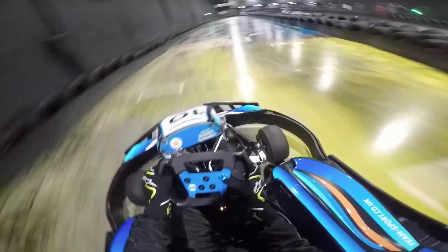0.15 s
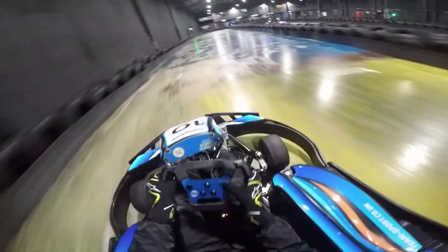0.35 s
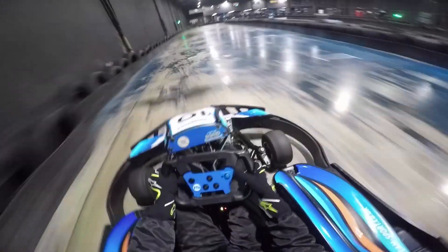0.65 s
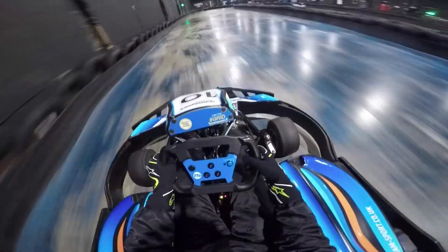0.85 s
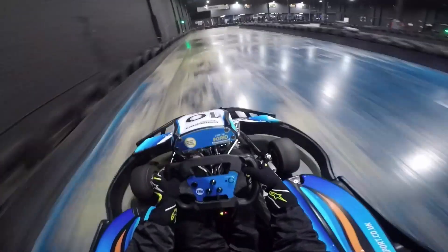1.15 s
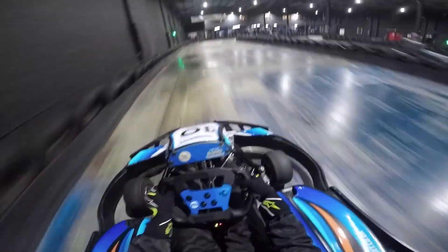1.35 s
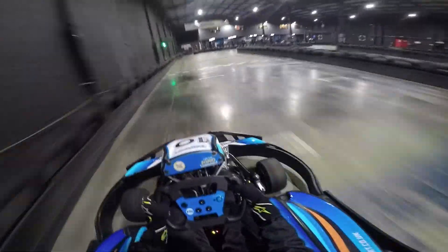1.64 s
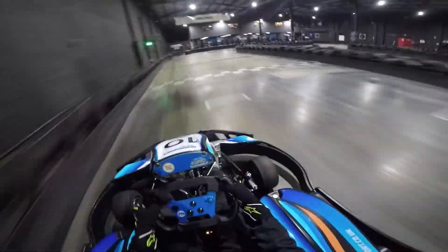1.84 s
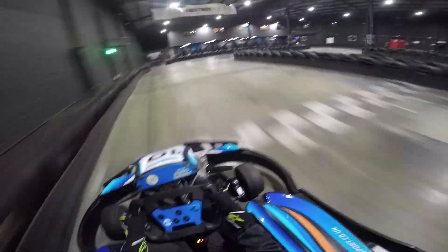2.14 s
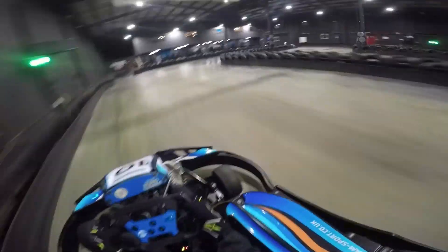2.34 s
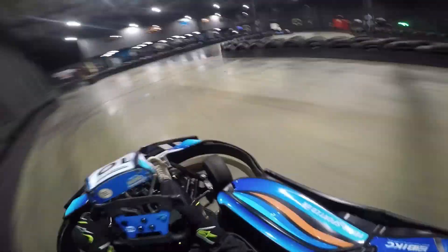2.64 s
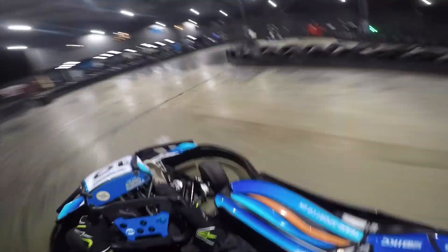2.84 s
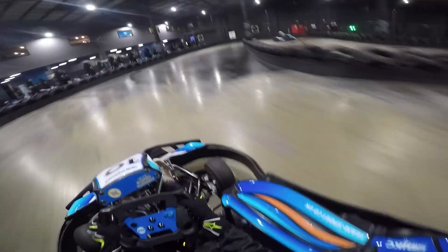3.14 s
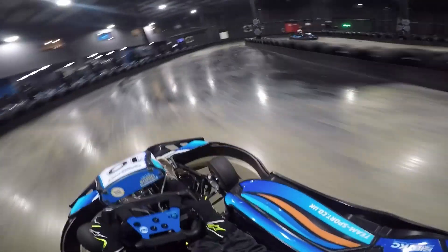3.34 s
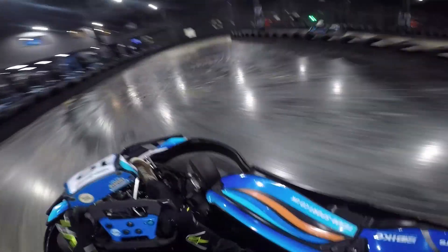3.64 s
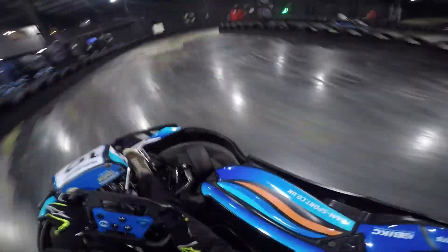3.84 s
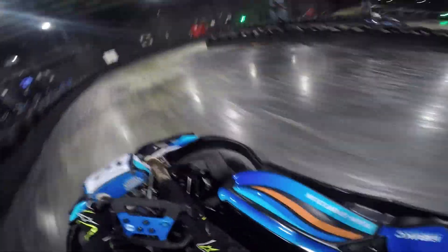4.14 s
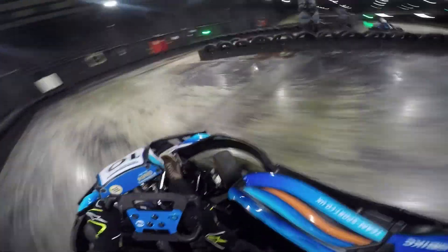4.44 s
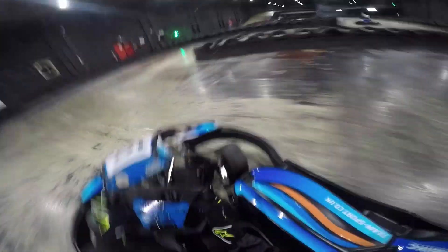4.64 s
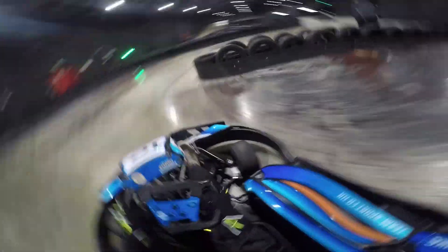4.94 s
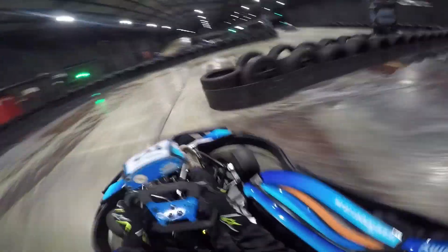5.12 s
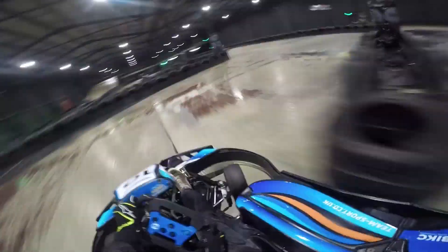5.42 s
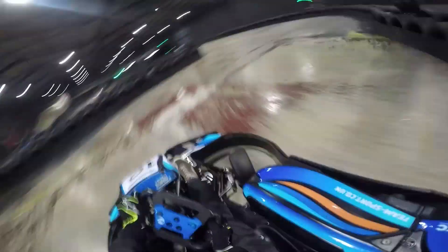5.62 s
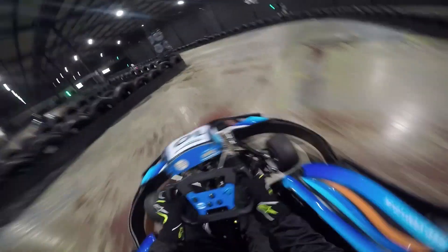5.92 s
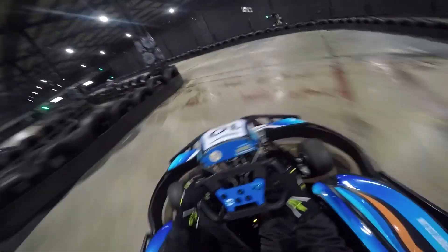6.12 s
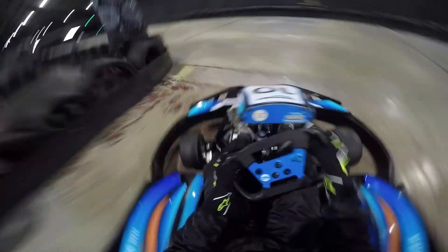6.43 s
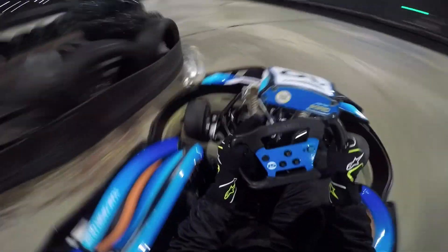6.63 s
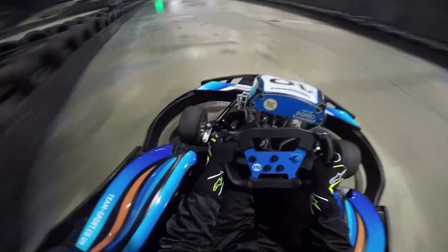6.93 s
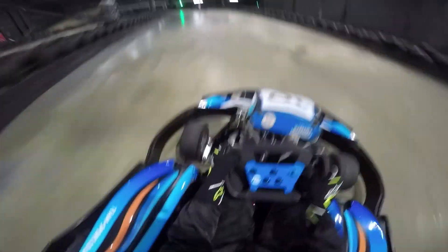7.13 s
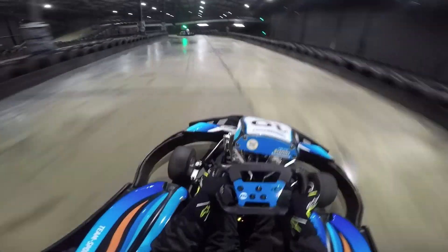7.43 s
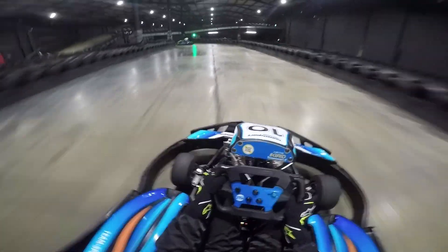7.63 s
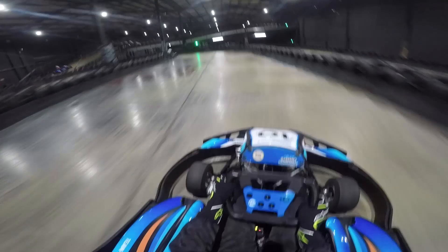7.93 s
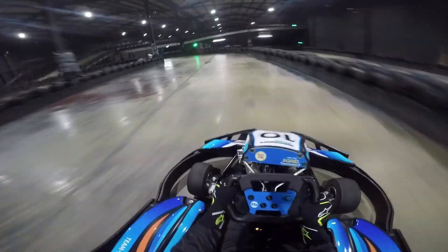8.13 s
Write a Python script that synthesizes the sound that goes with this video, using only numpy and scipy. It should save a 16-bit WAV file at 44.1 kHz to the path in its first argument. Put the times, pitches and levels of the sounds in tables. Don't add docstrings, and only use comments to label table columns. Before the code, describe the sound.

Small electric kart on a smooth indoor track: tyres squeal in wavering, stuttering bursts through bends, over low wind rumble and a fuzzy motor whine.

```python
import sys
import numpy as np
from scipy import signal
from scipy.fft import rfft, irfft, next_fast_len
from scipy.io import wavfile
from scipy.ndimage import uniform_filter1d

SR = 44100
rng = np.random.default_rng(int(sys.argv[2]) if len(sys.argv) > 2 else 0)


def store_pcm(level_fs):
    pcm = np.round(np.clip(level_fs, -1, 1) * 32767).astype(np.int16)
    wavfile.write(sys.argv[1], SR, np.atleast_2d(pcm).T)


def boost_factor(decibels):
    exponent = np.asarray(decibels, float) / 20
    return 10 ** exponent


N = 364707

# time in seconds, pitch in Hz, level in dB, overtones in dB.
LONG_SLIDE = [(3.66, 3800, -36, -16.5), (3.72, 3600, -15.5, -21), (3.78, 3543, -22.5, -8),
              (4.0, 3480, -22, -6), (4.135, 3440, -21, -6), (4.16, 3420, -30, -6), (4.19, 3410, -22, -7),
              (4.4, 3364, -23, -9), (4.5, 3247, -16, -21)]
# start in seconds, length in seconds, level in dB,
# first pitch in Hz, last pitch in Hz.
SINGING = [(5.401, 0.08, -18.5, 3450, 3300), (5.471, .1, -23, 3350, 3390), (5.6, 0.1, -23, 3300, 3450),
           (5.659, 0.095, -21, 3410, 3260), (5.79, .05, -16, 3595, 3116), (5.839, 0.048, -17, 3400, 3420)]
# start in seconds, length in seconds, level in dB,
# first pitch in Hz, last pitch in Hz.
OUTER = [(2.769, 0.13, -30.5, 3340, 3900), (2.922, .1, -28.5, 3900, 3380),
         (4.509, 0.061, -14.5, 3310, 3200), (4.578, 0.087, -12.5, 3180, 3050),
         (4.71, 0.198, -17.5, 3300, 3380), (4.904, 0.245, -19, 3330, 3500),
         (5.172, 0.15, -23.5, 3600, 3450), (4.78, 0.077, -25.5, 2600, 2000),
         (4.961, .05, -22.5, 2700, 2800), (1.53, 0.19, -33, 3450, 3450), (0.09, .03, -27.5, 4300, 3850),
         (5.87, .13, -21.5, 3450, 3350), (6.032, 0.23, -26.5, 3700, 3650), (6.244, 0.2, -25, 3700, 3200)]
# start in seconds, length in seconds, first level in dB, last level in dB, pitch in Hz.
INNER = [(0.082, .24, -28, -25, 4400), (.33, 0.14, -30, -26.5, 4480), (3.145, 0.05, -29, -26.5, 4300),
         (3.31, .055, -26, -26, 4500), (3.48, 0.065, -21, -26, 4420), (3.56, .1, -22, -22.5, 4400),
         (3.665, 0.15, -22, -31, 4440), (5.27, .04, -23, -24, 4400), (5.925, 0.053, -25, -26, 4500),
         (3.83, 0.31, -29, -33, 4400), (3.72, .4, -26, -29, 3895), (4.38, .05, -23, -25, 2850),
         (4.6, 0.058, -23, -25, 2750), (6.42, 0.91, -42, -48, 3470), (7.3, 0.97, -58, -48, 3480),
         (7.42, 0.67, -37, -39, 4450)]
# start in seconds,
# # length in seconds, first level in dB, last level in dB, pitch in Hz.
HIGH = [(5.255, 0.054, -21, -36, 5800), (6.03, 0.11, -19, -27, 5900), (6.14, .19, -31, -22, 5900),
        (6.625, 0.095, -26, -42.5, 5860), (3.45, 0.44, -46, -22, 8010), (3.93, .12, -43, -39, 8100),
        (5.12, .06, -49, -33, 8310), (.105, .05, -36, -38, 8250), (.17, .32, -41, -40, 8100),
        (5.85, .11, -26, -27, 7900)]
# start in seconds, length in seconds,
# first level in dB, last level in dB, pitch in Hz.
DRAG = [(1.405, 0.095, -26, -23.5, 3150), (1.49, .16, -19.5, -21.5, 3320), (1.63, 0.49, -23.5, -37, 3206),
        (5.98, 0.46, -26, -34, 4026), (7.12, 0.93, -36.5, -28.5, 4266), (8.05, 0.28, -32, -37, 4170),
        (0.19, 0.49, -31, -35.5, 6350), (1.44, 0.13, -33, -36, 5800), (2.14, 0.18, -45, -38, 9840),
        (2.3, 0.2, -42, -49.5, 9880), (2.47, 0.17, -47, -39, 9800)]
# time in seconds, pitch in Hz, level in dB, overtones in dB.
SWOOPS = [
    [(5.4, 3600, -24, -8), (5.425, 3150, -20, -9), (5.49, 3103, -23, -8), (5.55, 2844, -23, -8),
     (5.575, 2430, -19, -12), (5.6, 2700, -25, -10)],
    [(5.59, 2650, -26, -10), (5.62, 2952, -21.5, -7), (5.66, 3300, -20.5, -4), (5.69, 3050, -20, -6),
     (5.72, 2520, -21, -12), (5.75, 3105, -27, -10), (5.79, 3410, -27, -10)],
]
# time in seconds, peak in dB, pitch in Hz, length in seconds, overtones in dB.
GRABS = [(2.783, -12, 3300, 0.0047, -24), (3.157, -15, 3980, 0.0053, -12), (4.1677, -5, 3270, 0.0077, -7.5),
         (4.303, -13, 3200, 0.0062, -15), (4.4284, -6, 3130, 0.0064, -7.5),
         (4.5156, -7.5, 3200, 0.0072, -2), (4.579, -5, 3090, 0.0064, -5), (4.616, -14, 3430, 0.00405, -6.5),
         (4.639, -2.5, 3240, 0.0058, -5), (4.7142, -13, 3440, 0.006, -14),
         (4.9177, -5.5, 3300, 0.0077, -7.5), (4.986, -12, 3300, 0.006, -5),
         (5.4071, -6.5, 3620, 0.0068, -17), (5.488, -12, 3090, 0.0056, -14),
         (5.7965, -4, 3730, 0.0088, -12), (5.815, -22, 3110, 0.007, -1), (5.8445, -2.5, 3410, 0.0066, -5.5),
         (3.705, -9.5, 3940, 0.009, -11), (3.7284, -9, 3520, 0.008, -10), (3.7536, -13, 3460, 0.009, -10),
           (3.817, -10, 3470, 0.0079, -4), (3.847, -10, 3450, 0.011, -14), (3.894, -10, 3440, 0.01, -10),
           (3.955, -12, 3400, 0.0076, -10), (3.9754, -10, 3385, 0.0097, -10),
           (3.9924, -9.5, 3460, 0.009, -10), (4.034, -12, 3440, 0.009, -3), (4.045, -13, 3390, 0.009, -10),
           (4.103, -9.5, 3520, 0.009, -1.5), (4.134, -9, 3150, 0.009, -7), (4.1844, -8, 3430, 0.0096, -10),
           (4.2138, -10, 3400, 0.009, -10), (4.2324, -10, 3310, 0.009, -13),
           (4.266, -5.5, 3400, 0.009, -10), (4.281, -12, 3420, 0.009, -10),
           (4.3296, -12, 3400, 0.0077, -10), (4.342, -12, 3400, 0.009, -10), (4.364, -9, 3170, 0.009, -10),
           (4.382, -11, 3480, 0.008, -8), (4.46, -9, 3270, 0.009, -14), (4.4694, -13, 3500, 0.009, -10),
           (4.548, -9.5, 3480, 0.008, -8), (4.7406, -12, 3060, 0.009, -10), (4.7576, -9, 3590, 0.01, -10),
           (4.787, -10, 3130, 0.01, -10), (4.813, -15, 3650, 0.009, -10), (5.019, -15, 3410, 0.0073, -13),
           (5.4214, -8, 3120, 0.0097, -13), (5.4364, -8, 3500, 0.0079, -8), (5.463, -11, 3770, 0.009, -10),
           (5.5294, -15, 3450, 0.009, -6), (5.6126, -16, 2830, 0.0097, -10), (5.6585, -13, 3350, 0.009, -2),
           (5.698, -12, 2650, 0.009, -12), (5.8695, -14, 3480, 0.009, -13), (5.9294, -13, 3370, 0.009, -10)]
# time in seconds, peak in dB, pitch in Hz, length in seconds,
# overtones in dB.
GROANS = [(0.165, -20, 1873, 0.016, -18), (4.6683, -20, 1890, 0.01, -6.5), (4.791, -19, 2425, 0.019, -16),
          (4.805, -23, 2194, 0.011, -4), (5.318, -23, 1330, 0.013, -14), (5.378, -18, 1840, 0.0091, 0),
          (5.549, -14, 2810, 0.013, -17.5), (5.556, -22, 1821, 0.012, -5), (5.557, -21, 1350, 0.014, -14),
          (5.572, -16, 2420, 0.012, -9), (5.716, -15, 2540, 0.0132, -12), (5.728, -24, 1890, 0.017, -14),
          (6.617, -22, 1810, 0.012, -6.5), (6.619, -21, 1260, 0.0087, -14)]
# time in seconds, peak in dB.
TICKS = [(2.9759, -13.5), (3.1913, -16), (5.1902, -24.5), (5.2642, -14), (5.3705, -2), (5.5426, -14),
         (6.704, -28), (7.2594, -26), (7.3194, -24), (7.384, -21)]
# start in seconds, length in seconds, level in dB,
# brightness in dB per octave.
SCRUB = [(0.132, .03, -28, -12), (0.2, 0.32, -27.5, -11), (.5, 0.37, -37.5, -10), (1.455, 0.18, -22, -10.5),
         (2.927, .09, -36, -17), (3.156, 0.098, -36, -2), (3.436, 0.29, -29, -1), (3.692, .14, -22, 8),
         (3.817, 0.4, -15.5, 4), (4.114, 0.028, -13.5, -2.5), (4.15, 0.49, -18.5, -3),
         (4.435, 0.143, -19.5, -6), (4.582, 0.075, -21, -17), (4.74, 0.067, -14.5, -12),
         (4.907, .03, -18.5, -12), (4.98, 0.0212, -24, -26), (5.216, 0.0345, -39, -4),
         (5.268, .04, -30, -6), (5.398, 0.074, -20, -8), (5.484, 0.074, -25, -1), (5.604, 0.095, -21, 2),
         (5.787, .04, -27, -7), (5.853, 0.12, -23, -8), (6.039, 0.099, -16.5, -8),
         (6.125, 0.22, -18, -13.5), (6.35, 0.282, -30.5, -22), (6.627, 0.089, -28, -19),
         (6.687, 0.22, -35.5, -23), (7.087, 0.29, -36, -26), (7.8, 0.51, -36, -21)]
# frequency in Hz, time to fall 60 dB in seconds.
HALL = [(500, 0.75), (3000, 2.5), (8000, 0.099), (15000, 0.052)]
# time in seconds, motor load in dB, cornering from 0 to 1.
DRIVE = [(0.0, -32, 0.54), (0.58, -24.5, 0.04), (0.85, -29.5, 0.3), (1.36, -25, 0.4), (1.82, -24, 0.41),
         (1.98, -27.5, 0.43), (2.28, -23.5, 0.28), (2.45, -27.5, 0.3), (3.07, -30, 0.7),
         (3.15, -26.5, 0.47), (3.7, -29, 0.82), (4.17, -32.5, 0.98), (4.74, -30.5, 0.87), (5.25, -32, 0.88),
         (5.7, -31.5, 0.64), (6.6, -37.5, 0.39), (8.05, -28.5, 0.41), (8.27, -30, 0.47)]
# frequency in Hz, density in dB per Hz.
ROAR = [(330, -1.5), (480, -18), (900, -12.5), (1300, -7.5), (2400, -3.5), (3500, -6), (4500, -7),
        (6500, -17), (10000, -26.5), (15500, -51)]
# frequency in Hz, width in Hz, boost in dB.
FRAME = [(558, 38, 17), (650, 20, 14.5), (1735, 70, 3), (788, 50, 4), (1350, 80, 3), (2203, 27, 4),
         (2450, 150, 3)]
# time in seconds, flutter in dB.
AIRSPEED = [(0.0, -13.5), (0.7, -10.5), (1.2, -10.5), (2.2, -14.5), (3.1, -17.5), (4.1, -16.5),
            (4.6, -18.5), (5.4, -20), (5.9, -17.5), (6.25, -16.5), (6.9, -20), (7.4, -16), (8.0, -10.5),
            (8.27, -13)]
# time in seconds, half length in seconds, depth in dB.
LULLS = [(0.902, 0.27, -6), (2.934, 0.038, -4.5), (4.343, 0.11, -7), (5.187, 0.049, -2.5),
         (5.793, 0.13, -5.5), (6.533, 0.09, -7.5), (7.059, 0.073, -4.5)]
# frequency in Hz, density in dB per Hz.
BUFFET = [(8.8, -40), (15, -6.5), (38, -2), (51, -3.5), (70, -9), (90, -12), (120, -42), (200, -120)]
# frequency in Hz, density in dB per Hz.
FLUTTER = [(26, -5.5), (45, -1), (119, 0), (211, -11), (419, -29.5), (484, -30.5), (520, -27.5),
           (680, -48.5), (1140, -120)]
# frequency in Hz, width in Hz, boost in dB.
HOUSING = [(3450, 215, 3.5), (4600, 1070, 2), (5030, 680, -5.5), (6660, 140, 5), (7300, 840, -5),
           (8060, 420, 2), (9296, 1950, -5.5), (10340, 1400, 3), (11430, 2800, -7), (13600, 3160, -11),
           (14300, 600, 3), (14980, 900, -13)]

CATCH_S, LET_GO_S, LET_GO_SHARE, ONSET_DB = 0.0146, 0.0198, 0.12, -11.5
OUTER_FADE_DB_PER_S, BEND_BURST_DB = -46, 5.5
OVERTONE_DB_PER_OCTAVE = -17
SCUFF_RISE_S, SCUFF_FADE_DB, SCUFF_BEND = 0.014, -4.5, 3
IDLE_SCRUB_DB, IDLE_TILT_DB = -9, -11
STRAIGHT_TILT_DB, CORNER_TILT_DB = -10, 17
WHINE_HZ, WHINE_WIDTH_HZ, WHINE_DB, WHINE_PER_DB = 1835, 187, 9.5, 0.72
BUFFET_DB, BUFFET_PER_DB, BUFFET_LULL = -14, -0.05, 0.64
SELF_NOISE_DB = -50.5


def evened(x):
    return x / np.sqrt(np.mean(abs(x) ** 2) + 1e-20)


def read(points, hz):
    f, value = np.transpose(points)
    return np.interp(np.log(hz + 1), np.log(f + 1), value)


def bumps(modes, hz):
    return sum(db / (1 + (2 * (hz - f) / width) ** 2) for f, width, db in modes)


def columns(rows, t):
    s, *rest = np.transpose(rows)
    return [np.interp(t, s, c) for c in rest]


def wander(count, hz):
    z = rfft(rng.standard_normal(count))
    lowpass = 1 + (np.fft.rfftfreq(count, 1 / SR) / hz) ** 2
    return evened(irfft(z / lowpass, count))


def add(mix, s, sound):
    part = mix[round(s * SR):][:len(sound)]
    part += sound[:len(part)]


def noise(shape, band_hz, patchy_db, flicker_db, size):
    hop = size // 4
    frames, hz = N // hop + 5, np.fft.rfftfreq(size, 1 / SR)[:, None]
    a, b, patches = rng.standard_normal((frames, len(hz), 3)).T
    patches = uniform_filter1d(patches, size=5, axis=0)
    patches = evened(uniform_filter1d(patches, size=12, axis=1))
    flicker = evened(uniform_filter1d(rng.standard_normal(frames), size=5))
    colour_db, level_db = shape(np.arange(frames) * hop / SR, hz)
    colour = boost_factor(colour_db) * np.ones(frames)
    inside = (hz > band_hz[0]) & (hz < band_hz[1])
    colour /= np.sqrt((colour ** 2 * inside).sum(0))
    z = (a + 1j * b) * colour * boost_factor(level_db + patchy_db * patches + flicker_db * flicker)
    return signal.istft(z, nperseg=size, noverlap=size - hop)[1][:N] * 0.9


def slip(hz, swing, overtone_db, steep=0.3):
    turn = 2 * np.pi * (np.cumsum(hz) / SR + rng.random())
    sharp = boost_factor(overtone_db) * np.minimum(swing, 1.8) ** steep
    wave = 0
    for k in range(5):
        audible = (k + 1) * hz < SR / 2.5
        wave = wave + sharp ** k * boost_factor(-0.45 * k * k) * np.cos((k + 1) * turn) * audible
    return swing * wave


def squeal(rows, scatter, count=3, burst_db=6.5):
    t = np.arange(rows[0][0], rows[-1][0], 1 / SR)
    hz, level_db, overtone_db = columns(rows, t)
    grip = boost_factor(2.8 * wander(len(t), 35))
    blocks = 0
    for _ in range(count):
        burst = np.minimum(wander(len(t), 170), 1.6)
        stray = 0.9 * wander(len(t), 42) + 0.25 * wander(len(t), 200)
        drift = np.exp(scatter * (np.clip(stray, -1.8, 1.4) + 0.04))
        swing = evened(grip * boost_factor(burst_db * burst))
        blocks = blocks + slip(hz * drift, swing, overtone_db)
    edges = signal.windows.tukey(len(t), 0.04)
    return rows[0][0], boost_factor(level_db - 2.0) * blocks * np.sqrt(2 / count) * edges


def slide(s, length, db, last_db, hz, last_hz, overtone_db):
    let_go = LET_GO_S + LET_GO_SHARE * length
    release = s + max(length, CATCH_S + LET_GO_S + 0.01) - LET_GO_S
    return [(s, hz, db + ONSET_DB, overtone_db),
            (s + CATCH_S, hz, db, overtone_db),
            (release, last_hz, last_db, overtone_db),
            (release + let_go, last_hz, last_db + ONSET_DB, overtone_db)]


def outer_slide(s, length, db, hz, last_hz, overtone_db):
    return slide(s, length, db, db + OUTER_FADE_DB_PER_S * length, hz, last_hz, overtone_db)


def tread(rows, overtone_db, base_hz):
    slides = []
    for s, length, db, last_db, hz in rows:
        own_db = overtone_db + OVERTONE_DB_PER_OCTAVE * np.log2(hz / base_hz)
        slides.append(slide(s, length, db, last_db, hz, hz, own_db))
    return slides


def grab(s, db, hz, length, overtone_db, sag=0.031, rough_db=3.5):
    u = np.arange(0, 5 * length, 1 / SR) / length
    swing = (1.91 * u * np.exp(1 - 2.61 * u)) ** 1.85
    swing = swing * boost_factor(rough_db * np.clip(wander(len(u), 260), -2, 1))
    return s - 0.002, boost_factor(db) * slip(hz * np.exp(sag * (0.6 - u)), swing, overtone_db)


def tick(s, db):
    t = np.arange(0, 0.02, 1 / SR)
    band = signal.butter(2, [1400, 6360], "band", fs=SR)
    snap = signal.lfilter(*band, rng.standard_normal(len(t)))
    return s, boost_factor(db - 5) * evened(snap) * np.exp(-t / 0.0023)


def scuffs(t):
    s, length, db, tilt = np.transpose(SCRUB)[:, :, None]
    before = np.maximum(s - t, 0) / SCUFF_RISE_S
    after = (np.maximum(t - s, 0) / length) ** SCUFF_BEND
    power = boost_factor(2 * (db + SCUFF_FADE_DB * (before + after)))
    idle = boost_factor(2 * (IDLE_SCRUB_DB + columns(DRIVE, t)[0]))
    total = power.sum(0) + idle
    return 10 * np.log10(total), ((power * tilt).sum(0) + idle * IDLE_TILT_DB) / total


def scrub():
    def shape(t, hz):
        level_db, tilt = scuffs(t)
        bright_db = tilt * np.log2(np.maximum(hz, 5500) / 5500)
        low_cut_db = 8.4 * np.log2(np.maximum(4200 / (hz + 30), 1))
        return bright_db - low_cut_db, level_db - 7.0
    return noise(shape, (5200, 15000), 3.25, 1.34, size=256)


def tyres():
    mix = np.zeros(N)
    add(mix, *squeal(LONG_SLIDE, 0.08, count=7, burst_db=BEND_BURST_DB))
    for row in SINGING:
        add(mix, *squeal(outer_slide(*row, overtone_db=-5.5), 0.068, burst_db=BEND_BURST_DB))
    for row in OUTER:
        add(mix, *squeal(outer_slide(*row, overtone_db=-10.5), 0.09))
    for rows in tread(INNER, -11.5, 3850) + tread(HIGH, -15, 6200):
        add(mix, *squeal(rows, 0.05, count=5))
    for rows in tread(DRAG, -14, 2800):
        add(mix, *squeal(rows, 0.14, count=14))
    for rows in SWOOPS:
        add(mix, *squeal(rows, 0.06, count=2, burst_db=BEND_BURST_DB))
    for row in GRABS:
        add(mix, *grab(*row))
    for row in GROANS:
        add(mix, *grab(*row, sag=0.16, rough_db=5.0))
    for row in TICKS:
        add(mix, *tick(*row))
    return mix + scrub()


def hall(x):
    taps = np.zeros(SR)
    at = np.arange(300, SR - 20, 20) + rng.integers(0, 20, (SR - 301) // 20)
    taps[at] = rng.choice([-1., 1.], len(at))
    hz, t, z = signal.stft(taps, SR, nperseg=256)
    decay = boost_factor(-60 * t / read(HALL, hz)[:, None])
    tail = signal.istft(z * decay, SR, nperseg=256)[1]
    return signal.fftconvolve(x, tail / np.linalg.norm(tail))[:N]


def rolling():
    def shape(t, hz):
        level_db, corner = columns(DRIVE, t)
        tilt = STRAIGHT_TILT_DB + CORNER_TILT_DB * corner
        whine_db = WHINE_DB + WHINE_PER_DB * (level_db + 29.5)
        rings_db = bumps(FRAME + [(WHINE_HZ, WHINE_WIDTH_HZ, whine_db)], hz)
        bright_db = tilt * np.log2(np.maximum(hz, 2200) / 2200)
        return read(ROAR, hz) + rings_db - 80 * (hz < 250) + bright_db, level_db
    return noise(shape, (1000, 2500), 1.27, 0.59, size=2048)


def shelter(t):
    return sum(db * np.exp(-((t - s) / half) ** 2) for s, half, db in LULLS)


def wind():
    def deep_shape(t, hz):
        speed_db = BUFFET_PER_DB * (columns(AIRSPEED, t)[0] + 16)
        return read(BUFFET, hz), BUFFET_DB + speed_db + BUFFET_LULL * shelter(t)

    def flutter_shape(t, hz):
        return read(FLUTTER, hz), columns(AIRSPEED, t)[0] + shelter(t)

    deep = noise(deep_shape, (20, 60), 1.0, 0.44, size=4096)
    flutter = noise(flutter_shape, (60, 350), 1.67, 1.0, size=2048)
    level = np.sqrt(uniform_filter1d(deep ** 2, 2500) + 1e-6)
    return deep * (uniform_filter1d(level, 12000) / level) ** 0.23 + flutter


def scene():
    rubber = tyres()
    hiss = boost_factor(SELF_NOISE_DB) * rng.standard_normal(N)
    return (rubber + boost_factor(-13) * hall(rubber) + rolling() + wind() + hiss)[None]


def band_limit(x):
    return signal.sosfilt(signal.butter(12, 15200, fs=SR, output="sos"), x)


def record(dry):
    size = next_fast_len(N)
    hz = np.fft.rfftfreq(size, 1 / SR)
    coloured = irfft(rfft(dry, size) * boost_factor(bumps(HOUSING, hz)), size)
    limited = 1.3 * np.tanh(coloured / 1.3)
    mix = irfft(rfft(limited) * (hz < 15200), size)[:, :N]
    return band_limit(mix)


dry = scene()
out = record(dry)
store_pcm(out)
```